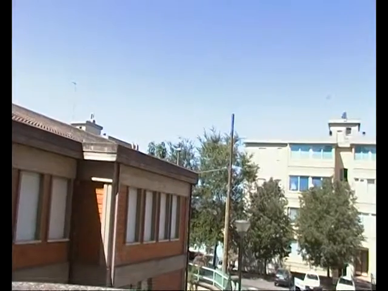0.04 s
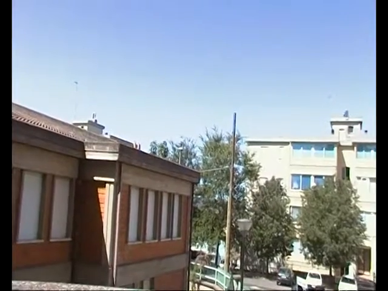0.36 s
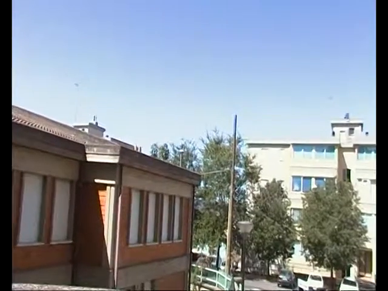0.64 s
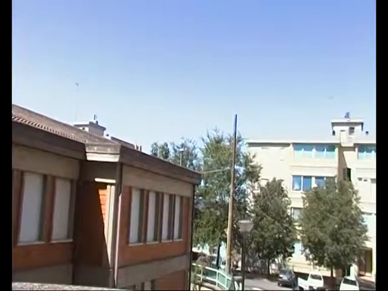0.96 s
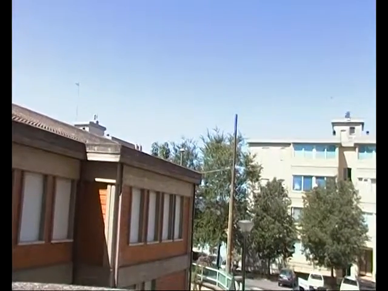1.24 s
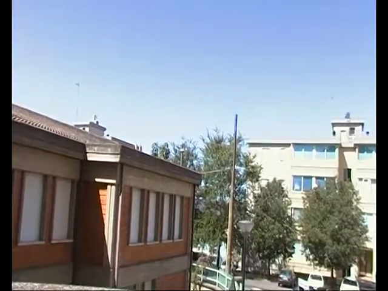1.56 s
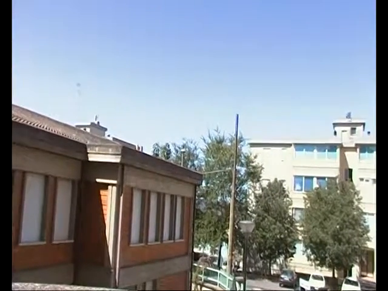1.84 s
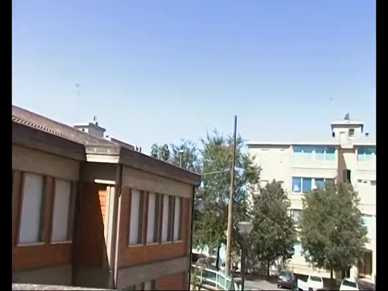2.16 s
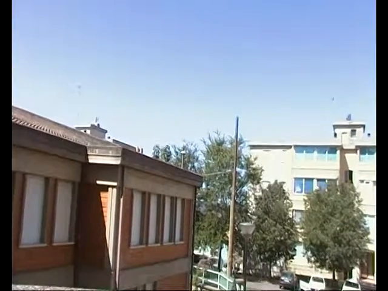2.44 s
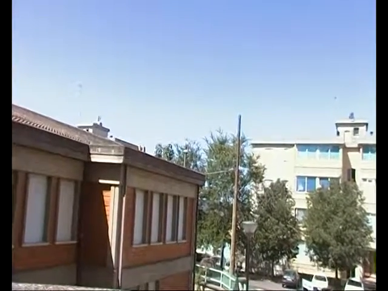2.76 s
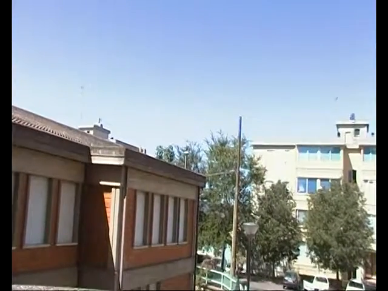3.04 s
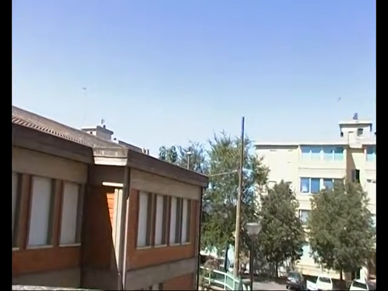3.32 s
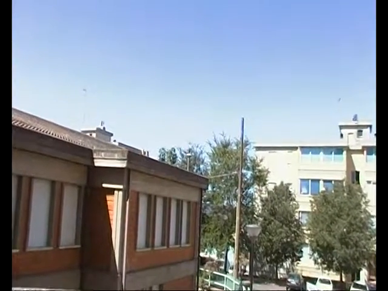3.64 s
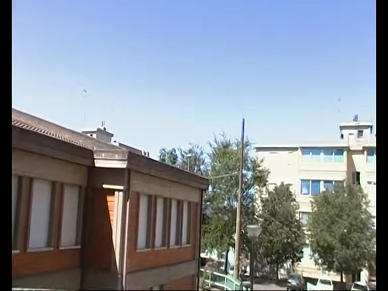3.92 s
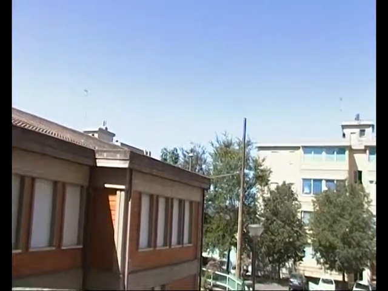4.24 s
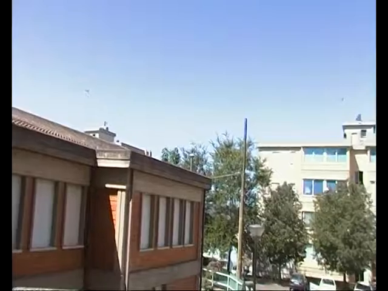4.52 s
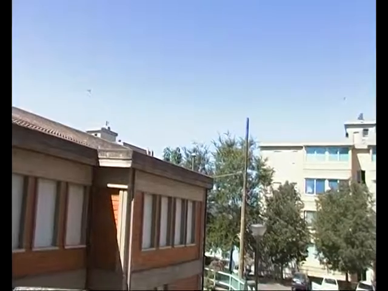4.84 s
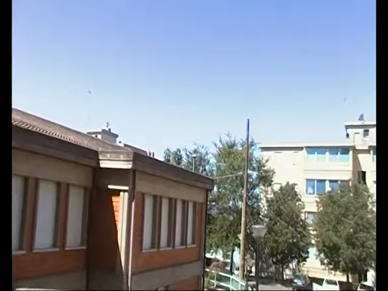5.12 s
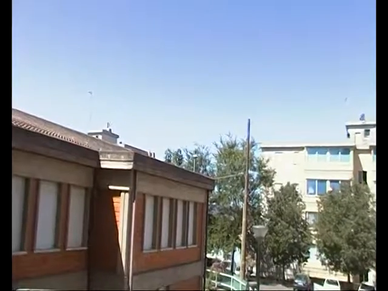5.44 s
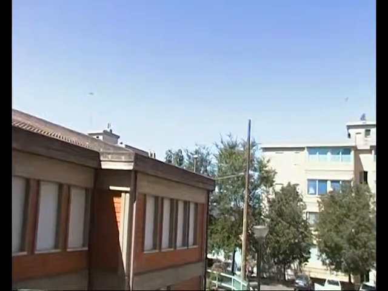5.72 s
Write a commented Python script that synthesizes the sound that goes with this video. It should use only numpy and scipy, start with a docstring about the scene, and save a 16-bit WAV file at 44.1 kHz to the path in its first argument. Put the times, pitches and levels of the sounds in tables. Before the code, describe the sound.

A distant two-bladed helicopter approaches over a town street for about six seconds, thumping evenly at roughly thirteen beats a second above a low hum and steady hiss. At first roofs partly muffle it. A faint thin squeal and a soft scuff open the scene, a bird chirps briefly at 0.4 seconds, and another squeal and tiny rustles follow between 0.6 and 1.2 seconds. Around 2 seconds the helicopter comes clear and grows louder: each deep thump carries a rough slap, echoing off house fronts over the tail rotor's buzzing drone and a soft engine roar. Light rustles come near 4 seconds. The blades gain a slight bright snap around 4.6 and 5.7 seconds, and a faint turbine whine swells near 5 seconds. The thin squeals return faintly from 5.4 seconds. The strongest thumps slightly overload the microphone, and the beat continues to the end.

```python
"""A two-bladed helicopter approaches, far off over a town street. At first roofs screen it, and a bird,
thin squeals and rustles sound over hum and hiss. Around 2 s it comes clear: each blade pass is a pressure
dip with a rough slap, doubled by the ground and returned by house fronts, over the tail rotor's drone.
More rustles come near 4 s, the nearest passes snap, and the faint turbine whine swells near 5 s before
the squeals return. The strongest thumps overload the microphone."""
import sys
import numpy as np
from scipy import signal
from scipy.fft import rfft, irfft, next_fast_len
from scipy.io import wavfile
from scipy.ndimage import map_coordinates

SR = 44100
rng = np.random.default_rng(int(sys.argv[2]) if len(sys.argv) > 2 else 0)


def dump(signal):
    """Clip the signal to [-1, 1] and save it as 16-bit WAV at the path in sys.argv[1]."""
    limited = np.clip(np.atleast_2d(signal).T, -1, 1)
    pcm = np.round(limited * 32767).astype(np.int16)
    wavfile.write(sys.argv[1], SR, pcm)


N = 263718

# blade-passing frequency: (time [s], rate [Hz])
BLADE_RATE = [(.6, 12.82), (1.5, 12.9), (2.55, 12.822)]


def amp(db):
    """Amplitude ratio of a level in decibels."""
    return 10 ** (np.asarray(db) / 20)


def unit(x):
    """Normalisation to rms 1."""
    return x / np.sqrt(np.mean(x ** 2) + 1e-20)


def clock():
    """Sample times in seconds."""
    return np.arange(N) / SR


def along(points, hz):
    """Interpolation of (frequency, value) points on a log-frequency axis."""
    f, v = np.transpose(points)
    return np.interp(np.log(hz + 1), np.log(f + 1), v)


def curve(points):
    """Linear interpolation of (time, value) points at each sample."""
    return np.interp(clock(), *np.transpose(points))


def wobble(rate):
    """Smooth random modulation: a spline with rate knots a second."""
    return map_coordinates(rng.standard_normal(int(N * rate / SR) + 4), [np.arange(N) * rate / SR])


def swell(peak_s, half_s):
    """Gaussian envelope, 1 at its peak."""
    return np.exp(-((clock() - peak_s) / half_s) ** 2)


def filtered(x, response):
    """Filtering by spectral multiplication; a fading mirror image keeps the end smooth."""
    size = next_fast_len(N + SR)
    mirror = x[..., ::-1][..., :SR // 8] * np.linspace(1, 0, SR // 8)
    spectrum = rfft(np.concatenate([x, mirror], axis=-1), size)
    return irfft(spectrum * response(np.fft.rfftfreq(size, 1 / SR)), size)[..., :N]


def coloured(x, colour):
    """Spectral shaping by (frequency, level) points, at rms 1."""
    return unit(filtered(x, lambda hz: amp(along(colour, hz))))


def delayed(x, first_ms, last_ms):
    """Propagation delay over a steadily changing path."""
    return np.interp(clock() - np.linspace(first_ms, last_ms, N) / 1000, clock(), x, left=0)


def spread(pair, colour):
    """Diffuse-field coherence: two independent signals become stereo, alike in bass, apart in treble."""
    # (frequency [Hz], left-right coherence [ratio])
    coherence = [(200, 0.95), (600, 0.94), (1000, 0.86), (2000, 0.49), (4000, 0.19), (10000, 0.1)]
    angle = lambda hz: np.arccos(np.clip(along(coherence, hz), -1, .998)) / 2
    mid, side = filtered(pair, lambda hz: amp(along(colour, hz)) * [np.cos(angle(hz)), np.sin(angle(hz))])
    return np.array([mid + side, mid - side])


def rush(colour):
    """Diffuse stereo noise at rms 1."""
    return unit(spread(rng.standard_normal((2, N)), colour))


def scatter(x, positions=5):
    """Reverberation: the street's diffuse tail decays exponentially, its pattern drifting with time."""
    # (frequency [Hz], reverberation time [s])
    decay = [(60, 0.31), (160, 0.58), (300, 0.44), (800, 0.13), (2000, 0.084), (5000, 0.19)]
    # scattered spectrum: (frequency [Hz], level [dB])
    colour = [(20, -3.5), (80, -0.5), (140, -1.5), (290, 5), (450, 11.5), (800, 3.5), (1500, 11),
              (5000, 4.5)]
    hz, t, noise = signal.stft(rng.standard_normal((positions, 2, SR // 2)), SR, nperseg=256)
    tails = signal.istft(noise * amp(-60 * t / along(decay, hz)[:, None]), SR, nperseg=256)[1]
    place = np.linspace(0, positions - 1, N)
    wet = np.zeros((2, N))
    for k, tail in enumerate(tails):
        crossfade = np.sqrt(np.clip(1 - abs(place - k), 0, 1))
        wet += crossfade * signal.fftconvolve(x[None], tail / np.linalg.norm(tail[0]), axes=1)[:, :N]
    return spread(wet, colour)


def shadow(clear_at_s=1.86, time_constant_s=.64):
    """Acoustic shadow of the roofs, falling from near 1 to 0 as the helicopter comes clear."""
    return 1 / (1 + np.exp((clock() - clear_at_s) / time_constant_s))


def town_noise(hum_db=-31, hiss_db=-52, hiss_db_per_s=-.5):
    """Ambient noise: a low wavering hum and a slowly sinking hiss."""
    # both spectra: (frequency [Hz], relative density [dB])
    hum = [(8, -23), (25, -13), (60, -5.5), (150, -6.5), (290, -6.5), (400, -15.5), (900, -60.5)]
    hiss = [(500, -11), (2500, 7), (4500, 3), (6000, 1), (8000, 0.5), (10000, -3), (11200, -7.5),
            (12000, -22), (13500, -19.5), (15000, -32.5)]
    return amp(hum_db + wobble(1.3)) * rush(hum) + amp(hiss_db + hiss_db_per_s * clock()) * rush(hiss)


def bird():
    """Frequency modulation: brief whistled glides, most of them rising."""
    # (time [s], length [s], start [Hz], end [Hz], bend [over 1 levels off, under 1 flicks], level [dB])
    chirps = [(.328, .02, 4100, 3850, 1.5, -55), (.348, .019, 3800, 5100, .6, -49),
              (.363, 0.027, 3550, 4530, 3.2, -43), (.366, .034, 3200, 4130, 4.5, -44)]
    out = np.zeros(N)
    for onset, length, start_hz, end_hz, bend, db in chirps:
        progress = np.clip((clock() - onset) / length, 0, 1)
        pitch = end_hz + (start_hz - end_hz) * (1 - progress) ** bend + 25 * wobble(500)
        out += amp(db) * np.sin(np.pi * progress) * np.sin(2 * np.pi * np.cumsum(pitch) / SR)
    return out


def far_squeals():
    """Random modulation of pitch and level roughens thin, high tones."""
    # (time [s], length [s], start [Hz], end [Hz], level [dB])
    squeals = [(0, 0.27, 4120, 4300, -62), (.6, .11, 5300, 5120, -62), (5.39, .22, 4130, 4180, -64),
               (5.618, .4, 4130, 4090, -66)]
    out = np.zeros(N)
    for onset, length, start_hz, end_hz, db in squeals:
        progress = np.clip((clock() - onset) / length, 0, 1)
        pitch = start_hz + (end_hz - start_hz) * progress + 35 * wobble(200)
        envelope = amp(db + 3 * wobble(45)) * np.sqrt(abs(np.sin(np.pi * progress)))
        out += envelope * np.sin(2 * np.pi * np.cumsum(pitch) / SR)
    return out


def rustles():
    """Short bursts of band-limited noise are heard as rustles and scuffs."""
    # (time [s], length [s], centre [Hz], width [octaves], level [dB])
    scuffs = [(0.09, 0.081, 1200, 0.67, -41), (1.018, 0.0088, 2800, .4, -52),
              (1.155, 0.021, 2900, 0.44, -46.5), (3.854, 0.015, 4100, 0.45, -49.5),
              (3.92, 0.037, 3880, .45, -53), (3.987, .012, 3200, .4, -50), (4.048, 0.011, 3600, .55, -50.5),
              (4.092, 0.012, 3900, 0.37, -53), (4.166, 0.38, 3070, 0.36, -55)]
    out = np.zeros(N)
    for peak_s, length, centre_hz, octaves, db in scuffs:
        band = lambda hz: np.exp(-(np.log2((hz + 1) / centre_hz) / octaves) ** 2 / 2)
        out += amp(db) * swell(peak_s, length / 2) * unit(filtered(rng.standard_normal(N), band))
    return out


def turbine(whine_hz=1822, whine_db=-68, beam_db=13.5):
    """Directivity: the turbine beams its wavering whine forward, so it swells once."""
    phase = 2 * np.pi * np.cumsum(whine_hz + 9 * wobble(25)) / SR
    level_db = whine_db + beam_db * swell(peak_s=4.9, half_s=1.1)
    flutter_db = 2.5 * np.array([wobble(8.4), wobble(27)])
    return amp(level_db + flutter_db) * np.sin(phase)


def engine_roar(open_db=-38, shadow_db=-2):
    """Broadband noise radiates from the engine and the downwash."""
    # (frequency [Hz], relative density [dB])
    roar = [(100, -43.5), (400, 1.5), (520, 7.5), (700, 7), (1000, -0.5), (1400, -2.5), (1850, -7.5),
            (2400, -18.5), (4000, -31.5), (7000, -54)]
    return amp(open_db + shadow_db * shadow() + .58 * wobble(7)) * rush(roar)


def blade_count(first_pass_s=.049):
    """Phase as the integral of rate: blade passes so far, with a thump at each whole number."""
    # wander of the beat: (time [s], lag [ms])
    wander = [(0, 1.62), (1, .78), (2, .92), (3, -.11), (4, .24), (5, -.61), (6, -.4)]
    rate = curve(BLADE_RATE)
    return np.cumsum(rate) / SR - rate[0] * (first_pass_s + curve(wander) / 1000)


def ms_from_pass(count):
    """Phase over rate gives the signed time from the nearest blade pass."""
    return (count - np.round(count)) / curve(BLADE_RATE) * 1000


def tail_rotor(count, gear_ratio=5.125, open_db=-24.5, shadow_db=-12.5, flutter_db=3):
    """A harmonic series geared to the main rotor; each partial fades on its own in the moving air."""
    # (harmonic [number], relative level [dB])
    harmonics = [(1, -5), (2, -2.5), (3, -7.5), (4, -5.5), (5, -11), (6, -19.5)]
    phase = 2 * np.pi * gear_ratio * count
    drone = np.zeros(N)
    for k, db in harmonics:
        fading = amp(db + flutter_db * wobble(2.217))
        drone += fading * np.cos(k * phase + rng.uniform(0, 2 * np.pi) + .5 * wobble(7))
    return np.sqrt(2) * amp(open_db + shadow_db * shadow()) * drone


def throb(count, open_db=-21, shadow_db=-5):
    """Loading noise: the lift on the blades radiates long waves that diffract over the roofs."""
    # (harmonic of the blade rate [number], relative level [dB])
    harmonics = [(2, -19), (3, 4)]
    wave = -sum(amp(db) * np.cos(2 * np.pi * k * count) for k, db in harmonics)
    return np.sqrt(2) * amp(open_db + shadow_db * shadow() + .46 * wobble(3.5)) * wave


def ringing(thump):
    """Resonance: thumps ring the gaps between houses; each mode swells and fades as the source moves."""
    # (frequency [Hz], bandwidth [Hz], level [dB], peak time [s], half length [s])
    modes = [(135, 23, -5, 0.35, 0.62), (208.8, 2.7, 10.5, 1.23, 0.33), (290, 14.7, 3.5, 0.96, 0.55),
             (254, 62, -6, 2.85, 0.43), (200, 4.7, 6.5, 5.15, 0.32), (269.4, 11, 5, 5.73, .69),
             (205, 46, 0, 6.13, .45), (390, 40, -5.5, 5.2, 0.76)]
    out = np.zeros(N)
    for mode_hz, width, db, peak_s, half_s in modes:
        resonance = lambda hz: 1j * hz * width / (mode_hz ** 2 - hz ** 2 + 1j * hz * width)
        out += amp(db) * swell(peak_s, half_s) * filtered(thump, resonance)
    return out


def arrival(x, first_ms, last_ms, db, peak_s, half_s, cutoff_hz):
    """Propagation over one path: the sound is low-passed and delayed, and it swells and fades."""
    dull = filtered(x, lambda hz: 1 / (1 + (hz / cutoff_hz) ** 2))
    return amp(db) * swell(peak_s, half_s) * delayed(dull, first_ms, last_ms)


def street(thump, slap, scatter_db=-14):
    """Multipath interference: ground and wall reflections drift in lag, sweeping the colour upward."""
    # all paths: (first lag [ms], last lag [ms], level [dB], peak time [s], half length [s], cutoff [Hz])
    walls = [(-2.2, 1.38, -6, 5.97, 0.76, 2500), (7, 4.6, -8, 1.78, 2.4, 620),
             (10, 6.89, -11.5, 3.3, 1.82, 3300), (10.5, 4.16, -7.5, 2.77, 2.45, 1600),
             (12.5, 13.45, -11.5, 3.42, 1.4, 910), (14, 7.68, 0.74, 3.97, 3.4, 210),
             (17.5, 15.4, 3.5, 5.37, 2.1, 130), (18.5, 10.85, 3, 4.47, 3.41, 146),
             (23.5, 33.8, -10.5, 6.3, 2.2, 550), (24.5, 21.64, -7, .8, 8.6, 99),
             (31.5, 12.2, -13.5, 0.65, 1.9, 540), (33.5, 25.85, -8.5, 1.63, 1.5, 286),
             (35.5, 47.5, -7, 1.67, 2.5, 95), (36.5, 35.8, 1.5, 4.28, 4.07, 91),
             (46, 40, -10.5, 5.2, 2, 485), (52, 50.6, -7, 4.5, 2.23, 300),
             (57, 54.05, -0.5, 1.74, 1.62, 71), (62.5, 55, -1, 4.53, 3.6, 84),
             (65.5, 64, -3, 4.66, 3.05, 177), (69.5, 59.8, -14.5, 1.6, 3.7, 415),
             (74, 64.5, -12.5, 2.5, 1.2, 710), (77, 75.1, -13, 2.06, 3.05, 400)]
    far_wall = (29.5, 29, -9.5, 4.5, 1, 1998.5)
    direct, ground = (0, 0, 0, 4, 2.52, 3000), (3.39, 2.756, 2.1, 4.32, 3.15, 336)
    beat = sum(arrival(thump + slap, *path) for path in [direct, ground, *walls])
    # one house front returns the slap most strongly while the roofs hide the helicopter
    bounce = amp(-17 + 16 * shadow()) * delayed(slap, first_ms=14, last_ms=4)
    diffuse = scatter(slap + amp(-1 - 5 * shadow()) * thump)
    return beat + bounce + arrival(slap, *far_wall) + ringing(thump) + amp(scatter_db) * diffuse


def snaps(count, half_ms=2.3):
    """Impulsive noise: the nearest blade passes carry a bright snap."""
    # (time [s], half length [s], level [dB])
    spells = [(3.5, .4, -62), (4.65, 0.28, -53.5), (5.701, .4, -55.5)]
    # (frequency [Hz], relative level [dB])
    colour = [(500, -15), (1200, 2.5), (1800, 0.5), (3000, -6.5), (5000, -17.5), (8000, -28.5)]
    grit = rng.standard_normal(N) * np.exp(-(ms_from_pass(count) / half_ms) ** 2)
    return sum(amp(db) * swell(peak_s, half_s) for peak_s, half_s, db in spells) * coloured(grit, colour)


def main_rotor(count, dip_db=3.5, slap_db=-34.5, shadow_db=-8, jitter_ms=.07):
    """Blade-vortex interaction: each blade sends a pressure dip and slaps the last blade's vortex."""
    # the slap's double crack and rough burst: (frequency [Hz], relative level [dB])
    crack_colour = [(150, -30), (265, 10.5), (330, 0.5), (430, 6), (520, 2.5), (660, 4), (780, 2.5),
                    (950, -6), (1200, -15.5), (2000, -23)]
    burst_colour = [(150, -30.5), (300, -2), (470, -6.5), (600, 2), (790, 2), (950, -1.5), (1130, -21),
                    (1600, -14), (3000, -38.5), (6000, -73)]
    # the blades bite harder into their wake: (time [s], half length [s], boost [dB])
    bites = [(.364, .03, 3.5), (0.604, 0.039, 8), (.91, .03, 8.5), (1.4, 0.38, 7.5), (2.6, 0.49, 4.5),
             (3.408, 0.34, 3.5), (3.631, .03, 3), (3.865, .03, 2), (4.6, 0.23, 1.5), (5.113, .03, 4.5),
             (5.7, 0.47, 2.5)]
    blade = np.round(count).astype(int) + 1
    early, size = np.tanh(rng.standard_normal((blade.max() + 1, 2)))[blade].T  # each pass differs a little
    ms = ms_from_pass(count) + jitter_ms * early
    pulse = lambda at_ms, half_ms: np.exp(-((ms - at_ms) / half_ms) ** 2)
    dip = -amp(dip_db + .5 * size) * pulse(0, half_ms=1.402)
    thump = filtered(dip, lambda hz: 1 - 1 / (1 + (hz / 45) ** 20))  # high-pass
    fronts = pulse(-2.687, half_ms=.27) + pulse(1.22, half_ms=.23)  # steep, before and after the dip
    crack = coloured(fronts, crack_colour)
    burst = coloured(rng.standard_normal(N) * pulse(0, half_ms=4), burst_colour)
    bite_db = sum(db * swell(peak_s, half_s) for peak_s, half_s, db in bites)
    slap = amp(slap_db + shadow_db * shadow() + bite_db) * (amp(.5) * crack + amp(-7.5) * burst)
    return thump, slap


def scene(echo_db=-7):
    """Superposition of the helicopter and the street's own sounds."""
    count = blade_count()
    helicopter = street(*main_rotor(count)) + throb(count) + tail_rotor(count) + turbine() + engine_roar()
    background = town_noise()
    small_sounds = bird() + far_squeals() + rustles()
    return background + small_sounds + amp(echo_db) * scatter(small_sounds) + helicopter + snaps(count)


def record(dry, low_hz=5, top_hz=15100):
    """Saturation and band limits: the microphone drops steady pressure and flattens the strongest thumps."""
    x = filtered(dry, lambda hz: 1j * hz / (low_hz + 1j * hz)) * signal.windows.tukey(N, .003)
    saturated = x / (1 + x ** 32) ** (1 / 32)
    return signal.sosfilt(signal.butter(16, top_hz, fs=SR, output="sos"), saturated)


dry = scene()
out = record(dry)
dump(out)
```